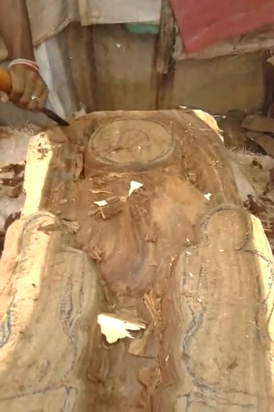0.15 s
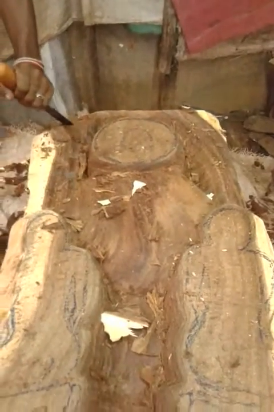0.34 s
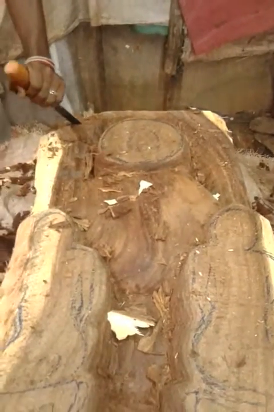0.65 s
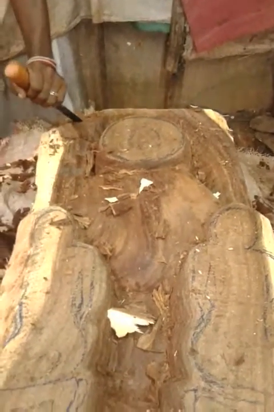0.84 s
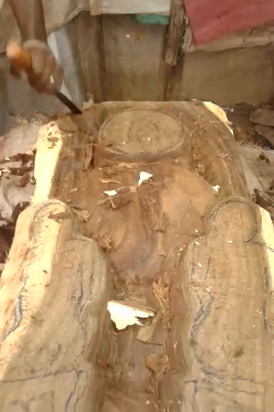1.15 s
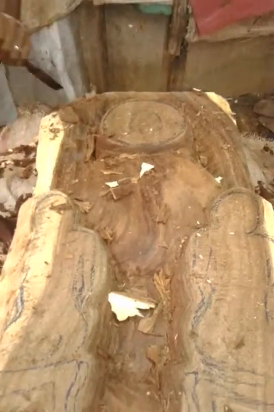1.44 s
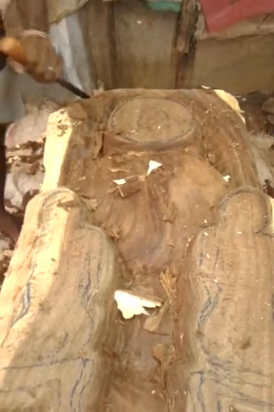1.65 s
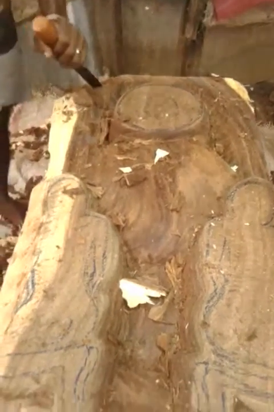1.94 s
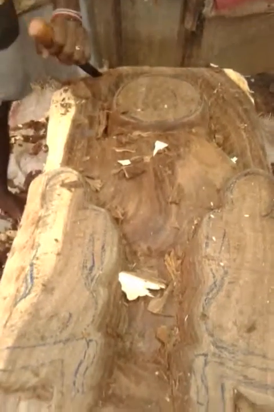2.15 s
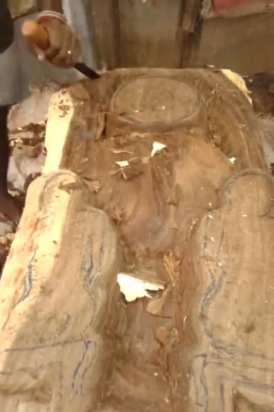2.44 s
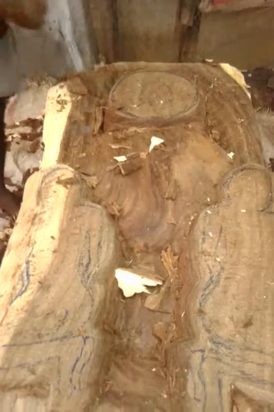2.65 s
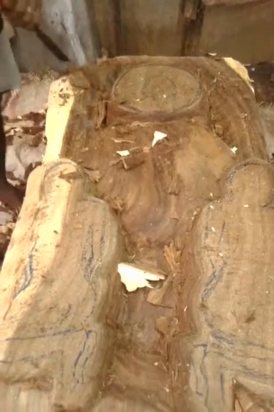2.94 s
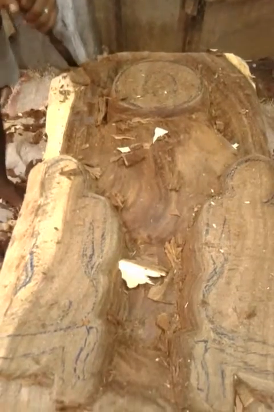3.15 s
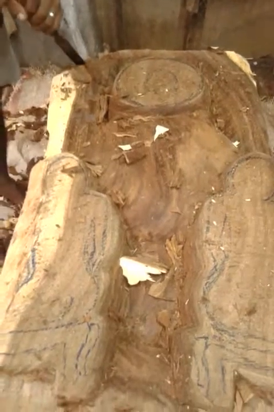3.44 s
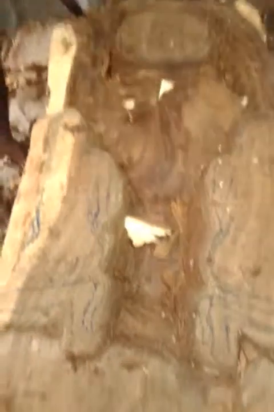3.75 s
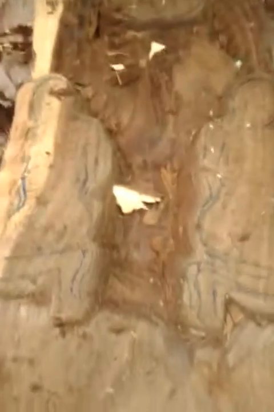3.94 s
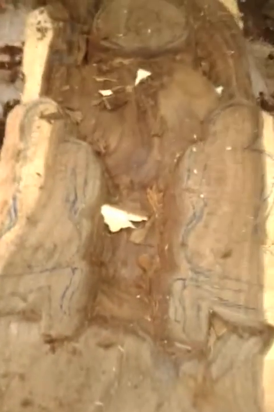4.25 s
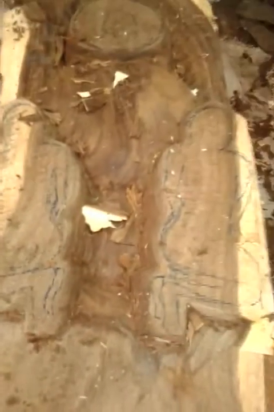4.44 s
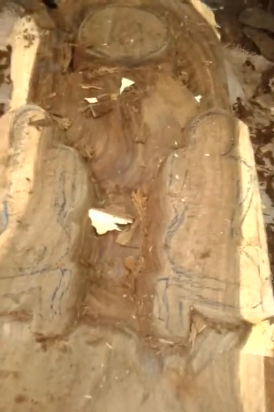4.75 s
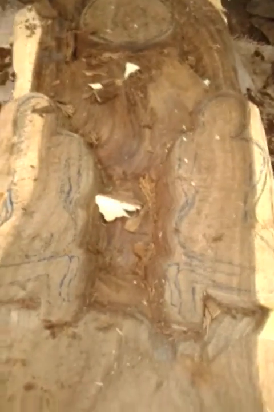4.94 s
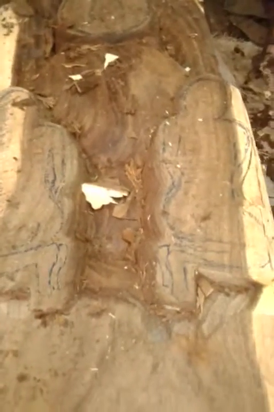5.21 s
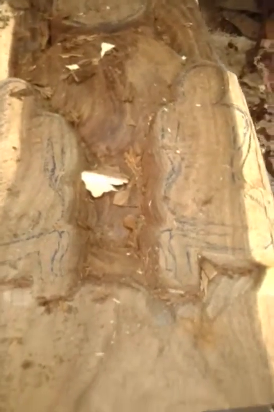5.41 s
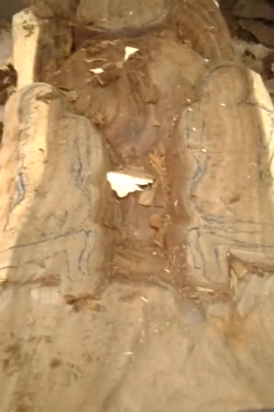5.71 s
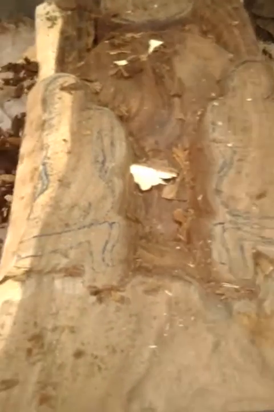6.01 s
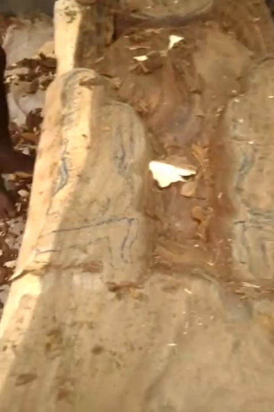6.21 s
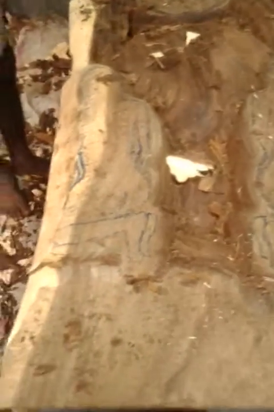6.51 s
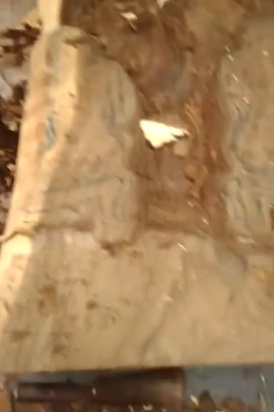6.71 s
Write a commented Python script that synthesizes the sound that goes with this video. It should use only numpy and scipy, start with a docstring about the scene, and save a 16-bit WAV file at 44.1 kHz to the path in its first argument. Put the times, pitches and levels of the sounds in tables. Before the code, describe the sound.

A mallet drives a chisel into a big wooden block with sharp, uneven knocks, while chips tick faintly between the blows.

```python
"""In a small open shed, a carver drives a chisel into a big block of wood with twelve uneven mallet blows.
Each blow cracks, makes the block and the tool ring, and dies quickly between the walls.
In between, chips tick and fall, the blade clinks and scrapes in the cut, wood taps on the block,
and hand and blade rub through the shavings. A faint low hum wavers behind it all."""
import sys
import numpy as np
from scipy import signal
from scipy.fft import rfft, irfft
from scipy.io import wavfile
from scipy.ndimage import uniform_filter1d

SR = 44100
rng = np.random.default_rng(int(sys.argv[2]) if len(sys.argv) > 2 else 0)


def materialize(psi):
    """Save the field psi as 16-bit PCM at rate SR to the path in sys.argv[1].

    A 1-D psi becomes a single channel; in a 2-D psi each row is a channel.
    """
    bounded = np.clip(np.atleast_2d(psi).T, -1, 1)
    quanta = np.round(bounded * 32767).astype(np.int16)
    wavfile.write(sys.argv[1], SR, quanta)


N = 302967
T = np.arange(int(.6 * SR)) / SR  # seconds since a hit
FFT_SIZE = 65536
HZ = np.maximum(np.arange(FFT_SIZE // 2 + 1) * SR / FFT_SIZE, 1)  # the frequencies a tone curve covers
BLOCK_HZ = 377  # the block's main note

# The mallet blows. Each row: start in seconds, level in dB, boosts in dB for the thud, the block's main
# note, the hollow body and the edge's bright bite, pitch of a narrow peak in the bite in Hz, then the
# tool's low note in Hz, its level in dB, its high note in Hz, its level in dB.
MALLET_BLOWS = [(0.1953, -23.5, 4.5, 2, -1, 2.5, 4670, 792, -14, 1906, -9.5),
                (0.7105, -22.5, 2.5, 2.5, -0.5, -2.5, 3950, 884, -14, 1410, -8),
                (1.2371, -23.5, 4.5, 1.5, 0.5, 1.5, 4705, 779, -10.5, 1208, -17.5),
                (2.1439, -25.5, -1.5, 4.5, -1.5, 3, 4365, 889, -13, 1770, -9),
                (2.6473, -27.0, -3, 4, -2.5, -5, 3490, 1055, -15.5, 1212, -6.5),
                (3.494, -26.5, 3.5, 4.5, -1.5, -2.5, 4860, 931, -17, 1245, -6.5),
                (3.9266, -24, 6, -11, -2, -2, 4700, 804, -13, 1450, -9.5),
                (4.3816, -25.5, 5, 7, 3, 0, 4900, 809, -11.5, 1440, -14),
                (5.148, -29.5, 6.5, -2, 6, 3, 5450, 808, -4, 1576, -6),
                (5.5721, -25.5, 1, 0.5, 0.5, 0, 4150, 830, -9.5, 2063, -9),
                (6.432, -26, 1, -16, 2.5, -5, 5330, 1015, -5.5, 1462, -12.5),
                (6.7881, -28.5, -0.5, 4, 1.5, -4.5, 4130, 1076, -1, 1155, -6)]


def carving():
    """All the mallet blows, and their faint dull echo from a wall across the yard."""
    out = np.zeros(N)
    for start, db, *character in MALLET_BLOWS:
        add(out, start, undb(db) * blow(*character))
    # trim the deep rumble under the blows
    out = signal.sosfilt(signal.butter(3, 75, "high", fs=SR, output="sos"), out)
    far_wall = colour(later(burst(t60=.15, rise=.002), .168), 20 * (bell(500, 1.5) - 1))
    return out + undb(-36) * signal.fftconvolve(out, far_wall)[:N]


def blow(thud_db, block_db, body_db, bite_db, bite_hz, low_hz, low_db, high_hz, high_db):
    """One blow: a crack, the ringing block, and two notes of the tool that move with grip and depth."""
    tone_db = thud_db * bell(170, .7) + body_db * bell(660, .45)
    tone_db += bite_db * bell(5200, .7) + 4 * bell(bite_hz, .17)
    crack = wood_crack(tone_db, thud_db)
    block = block_ring(tone_db + block_db * bell(BLOCK_HZ, .15))
    tool = undb(low_db) * ring(low_hz, t60=.12) + undb(high_db) * ring(high_hz, t60=.12)
    return undb(43) * crack + undb(7) * block + undb(13) * tool


# The tone of a blow's crack. Each row: frequency in Hz, level in dB.
CRACK_TONE = [(25, -39), (60, -33), (110, -27), (210, -16), (420, -2), (750, 2), (1600, 2), (2100, 0.5),
              (2700, -4), (3300, -5), (4700, -2.5), (5700, -4.5), (6800, -13.5), (9800, -25),
              (14000, -34.5)]


def wood_crack(tone_db, thud_db):
    """The mallet knocks the handle; 2 ms later the edge bites and fibres snap; then the shed echoes."""
    # the treble is uneven, with small hills and valleys that change from blow to blow
    uneven_db = 2.8 * patches(width_hz=130) * np.minimum(HZ / 3500, 1)
    wood_db = spectrum(CRACK_TONE) + tone_db + uneven_db
    contact = undb(-6) * later(signal.unit_impulse(len(T)), .0002)
    knock = colour(contact + burst(t60=.07), wood_db - 7 * bell(6600, .35) - 7 * bell(110, 1.3))
    bite = colour(later(burst(t60=.031), .0022), wood_db - 7 * bell(400, 1.6) + 2 * bell(6000, .11))
    snap = colour(later(burst(t60=.0059), .0022), wood_db - 12 * bell(500, 2.7))
    walls = colour(later(burst(t60=.15, rise=.0032), .006), wood_db)
    # the last of the echo is dull, and the bass comes back late
    tail = colour(burst(t60=.43, rise=.02), wood_db - 5 * bell(7000, 1.2))
    boom = colour(later(burst(t60=.17, rise=.006), .034), wood_db + thud_db - 30 * (1 - bell(155, .8)))
    direct = undb(-3) * knock + undb(-2) * bite + undb(-3.5) * snap
    return direct + undb(-4) * walls + undb(-27) * tail + undb(-1.5) * boom


# The notes block and chisel ring with. Each row: pitch in Hz, level in dB, time to fade in seconds.
BLOCK_NOTES = [(211, -26, 0.29), (290.7, -19.5, 0.23), (376.7, -8.5, 0.18), (537, -16, 0.13),
               (869, -13.5, 0.083), (1240, -9.5, 0.073), (1380, -9.5, 0.2), (1846, -12, 0.061),
               (1928, -11.5, 0.12), (2050, -11.5, 0.14), (2270, -14.5, .14), (3040, -10, 0.043),
               (3580, -10.5, 0.11), (3905, -12.5, .11), (4170, -12.5, 0.044), (4450, -10.5, 0.06),
               (4890, -11, .12), (5300, -13, 0.19), (5780, -15.5, 0.11), (6100, -21.5, 0.065)]


def block_ring(tone_db):
    """Block and chisel ring with many notes at once; each place of the edge mixes them differently."""
    out = np.zeros(len(T))
    chance = rng.standard_normal((len(BLOCK_NOTES), 2)) * [1.9, .003]
    for (hz, db, t60), (scatter_db, detune) in zip(BLOCK_NOTES, chance):
        db = db + np.interp(hz, HZ, tone_db)
        if abs(hz - BLOCK_HZ) > 50:  # the main note's level is not left to chance
            db += scatter_db
        out += undb(db) * ring(hz * (1 + detune), t60)
    return out


# Ticks of chips and blade. Each row: start in seconds, level in dB, body in dB, brightness in dB.
CHIP_TICKS = [(0.106, -61, 8.5, -8), (0.17, -62, 0, 14), (0.3751, -50, 2, -4), (0.542, -58, -1.5, -11),
              (0.5666, -34, -1.5, -4), (0.902, -54, 4, -6), (1.007, -56, -6, -35), (1.342, -46.5, 1, 13),
              (1.3876, -33.5, -9.5, -5.5), (1.455, -49.5, 8, -5), (1.549, -58, -13, -5),
              (1.586, -56, 12.5, 2), (1.689, -55.5, 5.5, -9), (1.861, -54, 18, -20), (1.874, -51, 9.5, -3),
              (2.048, -60.5, -14.5, 1), (2.078, -59.5, -6, 8), (2.338, -64, 1.5, 4.5),
              (2.494, -56, 3.5, 3.5), (2.965, -47, -20, 8), (3.195, -55.5, 8.5, 3), (3.62, -51, 2.5, -4),
              (3.677, -51.5, 11, 1), (4.105, -48, 7, -4), (4.136, -49, -10, -7), (4.194, -56.5, -22, -10),
              (4.296, -56.5, 6, -23), (4.6567, -47, -10, 0), (4.959, -60.5, -8.5, 9), (5.052, -64, 2, 5),
              (5.324, -65.5, 1.5, 23.5), (5.355, -50.5, 3.5, -9.5), (5.428, -58.5, 6, -12),
              (5.798, -50, -17, -2.5), (6.058, -60.5, -3.5, 2)]
# The tone of a tick. Each row: frequency in Hz, level in dB.
TICK_TONE = [(60, -26), (300, 3), (900, -4.5), (1800, 2.5), (3000, -6), (4200, 1), (5300, 6.5), (6800, -9),
             (14000, -25.5)]


def chip_ticks():
    """Chips snap and land, the blade knocks in the cut: a short crack and its echo in the shed."""
    out = np.zeros(N)
    for start, db, body_db, bright_db in CHIP_TICKS:
        tone_db = spectrum(TICK_TONE) + body_db * bell(600, 1) + bright_db * bell(8400, .35)
        tone_db += 2.2 * patches(width_hz=220) * np.minimum(HZ / 1500, 1)
        crack = burst(t60=.031, rise=.00075)
        echo = undb(-2) * burst(t60=.16, rise=.0074)
        tick = colour(crack + echo, tone_db)
        add(out, start, undb(db) * tick / np.std(tick[:int(.04 * SR)]))  # level set by the first 40 ms
    return out


# Clinks of the blade. Each row: start in seconds, level in dB, fade time the grip allows in seconds.
BLADE_CLINKS = [(.34, -50, .12), (.567, -29, .12), (2.966, -45, 8)]
# The notes of the steel. Each row: pitch in Hz, level in dB, time to fade in seconds.
STEEL_NOTES = [(1233, -7, .3), (1836, -17, 2.0), (4199, -6, .15), (4899, -11, .5), (5270, -3, .16),
               (5410, -3, .45)]


def blade_clinks():
    """The steel blade rings, more briefly when it is held tight."""
    out = np.zeros(N)
    for start, db, grip_t60 in BLADE_CLINKS:
        steel = sum(undb(note_db) * ring(hz, t60, rise=.0039) for hz, note_db, t60 in STEEL_NOTES)
        add(out, start, undb(db) * steel * fade(grip_t60))
    return out


# Soft taps of wood on the block. Each row: start in seconds, pitch in Hz, level in dB.
WOOD_TAPS = [(3.183, 570, -51), (3.214, 808, -51.5), (4.556, 452, -48), (4.716, 648, -56.5),
             (4.757, 776, -53), (4.999, 750, -54), (6.118, 682, -49.5), (6.163, 820, -51),
             (6.184, 807, -47)]


def wood_taps():
    """Each tap scuffs, sounds a hollow note and wakes the block's main note."""
    out = np.zeros(N)
    for start, hz, db in WOOD_TAPS:
        scuff = undb(32) * colour(burst(t60=.076), 40 * (bell(hz, 1.46) - 1))
        hollow = ring(hz, t60=.076, rise=.0013)
        block = undb(-7.5) * ring(BLOCK_HZ, t60=.26)
        add(out, start, undb(db) * (hollow + block + scuff))
    return out


# Strokes through the shavings. Each row: start in seconds, length in seconds, hiss in dB, rustle in dB.
SHAVING_STROKES = [(0.597, 0.084, -67, -58), (0.86, 0.38, -63.5, -65), (1.899, 0.18, -69.5, -70.5),
                   (2.791, 0.23, -73.5, -72), (3.195, .22, -80, -69.5), (3.62, 0.27, -66, -60),
                   (4.004, 0.38, -65, -63.5), (4.675, 0.16, -72.5, -68), (5.247, .32, -67.5, -70.5),
                   (5.698, 0.26, -67.5, -66), (6.124, 0.37, -63.5, -67.5), (6.535, 0.24, -71, -68.5)]
# The tones of the shavings' bright hiss and lower rustle. Each row: frequency in Hz, level in dB.
HISS_TONE = [(1500, -23), (3000, -7), (4200, -2.5), (5300, 4), (6600, -12.5), (9000, -20), (14000, -28)]
RUSTLE_TONE = [(40, -8), (130, -1.5), (350, 2.5), (700, -0.5), (1200, -7), (2000, -3.5), (3000, -17.5),
               (6000, -22)]


def shavings(snaps_per_second=22):
    """Hand and blade rub over the shavings, which hiss and rustle while single fibres snap."""
    hiss_gain, rustle_gain = undb(-78.5), undb(-72)  # the quiet between strokes
    for start, length, hiss_db, rustle_db in SHAVING_STROKES:
        end = start + length
        push = np.interp(np.arange(N) / SR, [start, start + .02, end, end + .045], [0, 1, 1, 0])
        hiss_gain = np.hypot(hiss_gain, undb(hiss_db) * push)
        rustle_gain = np.hypot(rustle_gain, undb(rustle_db) * push)
    hiss = unit(colour(grains(spread_db=2.7, per_second=130), spectrum(HISS_TONE)))
    rustle = unit(colour(grains(spread_db=2.8, per_second=60), spectrum(RUSTLE_TONE)))
    snap_moments = rng.random(N) < snaps_per_second / SR
    snap_sizes = undb(4 * np.minimum(rng.exponential(size=N), 3))
    snaps = signal.fftconvolve(snap_moments * snap_sizes, burst(t60=.0062) + .58 * burst(t60=.1))[:N]
    crackle = unit(colour(snaps, spectrum(HISS_TONE) + 2 * bell(10000, .7)))
    return hiss_gain * (hiss + undb(-3) * crackle) + rustle_gain * rustle


# Drags of the blade. Each row: start in seconds, length in seconds, level in dB.
BLADE_DRAGS = [(2.835, .13, -56.5), (2.952, 0.094, -53.5)]


def blade_drags():
    """The blade drags along the wood with a fine scrape, brighter in tone than a tick."""
    out = np.zeros(N)
    tone_db = spectrum(TICK_TONE) + 9 * bell(11000, .67)
    scrape = unit(colour(grains(spread_db=.5, per_second=590), tone_db))
    for start, length, db in BLADE_DRAGS:
        n = int(length * SR)
        add(out, start, undb(db) * scrape[:n] * signal.windows.tukey(n, .3))
    return out


# How the hum swells and fades. Each row: time in seconds, lower tone in dB, upper tone in dB.
HUM_LEVELS = [(0.0, -85.5, -73), (0.5, -88, -90.5), (1.09, -94.5, -77.5), (1.3, -85, -74), (1.72, -92, -82),
              (2.16, -79, -85), (2.58, -87, -89), (2.93, -68, -96), (3.16, -74, -98), (3.42, -86, -93),
              (3.88, -70.5, -74), (4.15, -75, -87.5), (4.71, -86, -73.5), (5.2, -69.5, -84.5),
              (5.83, -74, -73), (6.37, -78.5, -76), (6.87, -79, -66)]


def hum(lower_hz=68.5, upper_hz=81):
    """Two close low tones waver in pitch and strength over a soft rumble."""
    rumble_db = 22 * (bell(78, .43) - 1) - 20 * np.minimum(HZ / 2000, 1)
    out = undb(-75.5) * unit(colour(rng.standard_normal(N), rumble_db))
    times, *levels = np.transpose(HUM_LEVELS)
    for hz, level in zip((lower_hz, upper_hz), levels):
        pitch = hz * (1 + .028 * waver(per_second=7))
        tone = np.sqrt(2) * np.sin(2 * np.pi * np.cumsum(pitch) / SR)
        db = np.interp(np.arange(N) / SR, times, level) + 4.8 * waver(per_second=7)
        out += undb(db) * tone
    return out


def undb(db):
    """Turn decibels into a number to multiply by."""
    return 10 ** (np.asarray(db) / 20)


def unit(x):
    """Scale a sound to an average strength (rms) of 1."""
    return x / np.sqrt(np.mean(x ** 2))


def add(track, start, sound):
    """Mix a sound into the track, start seconds in."""
    i = int(start * SR)
    track[i:i + len(sound)] += sound[:N - i]


def later(x, seconds):
    """The same sound, delayed."""
    return np.pad(x, (int(seconds * SR), 0))[:len(x)]


def fade(t60):
    """A fade that is 60 dB down after t60 seconds."""
    return np.exp(-np.log(1000) * T / t60)


def ring(hz, t60, rise=.00033):
    """One struck note that rises quickly and fades."""
    return np.sin(2 * np.pi * (hz * T + rng.random())) * fade(t60) * (1 - np.exp(-T / rise))


def burst(t60, rise=.0001):
    """A fading puff of noise with a total energy of 1."""
    x = rng.standard_normal(len(T)) * fade(t60) * (1 - np.exp(-T / rise))
    return x / np.sqrt(np.sum(x ** 2))


def grains(spread_db, per_second):
    """Noise whose strength jumps at random, as fibres catch and let go."""
    hold = int(SR / per_second)
    sizes = undb(spread_db * np.minimum(rng.exponential(size=N // hold + 1), 5))
    return rng.standard_normal(N) * uniform_filter1d(np.repeat(sizes, hold)[:N], hold)


def waver(per_second):
    """A slow random drift, about 1 in size."""
    hold = int(SR / per_second)
    steps = np.repeat(rng.standard_normal(N // hold + 1), hold)
    return unit(uniform_filter1d(steps, hold)[:N])


def spectrum(points):
    """Join (Hz, dB) points into a tone curve: a level for every frequency."""
    hz, db = np.transpose(points)
    return np.interp(np.log(HZ), np.log(hz), db)


def bell(hz, octaves):
    """A smooth bump of height 1 around hz, for a tone curve."""
    return np.exp(-.5 * (np.log2(HZ / hz) / octaves) ** 2)


def patches(width_hz):
    """Random hills and valleys for a tone curve, about 1 in size."""
    knots = np.arange(0, SR / 2 + width_hz, width_hz)
    return np.interp(HZ, knots, rng.standard_normal(FFT_SIZE // 16)[:len(knots)])


def colour(x, db):
    """Filter a sound so each frequency is raised or lowered as the tone curve says."""
    cepstrum = irfft(np.log(undb(db)))
    # folding the second half onto the first keeps the filter from sounding before the hit
    cepstrum[1:FFT_SIZE // 2] *= 2
    cepstrum[FFT_SIZE // 2 + 1:] = 0
    response = irfft(np.exp(rfft(cepstrum)))[:FFT_SIZE // 16]
    return signal.fftconvolve(x, response)[:len(x)]


def scene():
    """Everything as heard from just above the block, in one channel."""
    return (carving() + chip_ticks() + blade_clinks() + wood_taps() + shavings() + blade_drags() + hum())[None]


def record(dry):
    """The microphone rounds the sharpest peaks and cuts the deepest bass and the highest treble."""
    ceiling, low_cut_hz, high_cut_hz = .75, 36, 14000
    rounded = ceiling * np.tanh(dry / ceiling)
    rounded = signal.sosfilt(signal.butter(2, low_cut_hz, "high", fs=SR, output="sos"), rounded)
    return signal.sosfilt(signal.ellip(10, .2, 70, high_cut_hz, fs=SR, output="sos"), rounded)


dry = scene()
out = record(dry)
materialize(out)
```